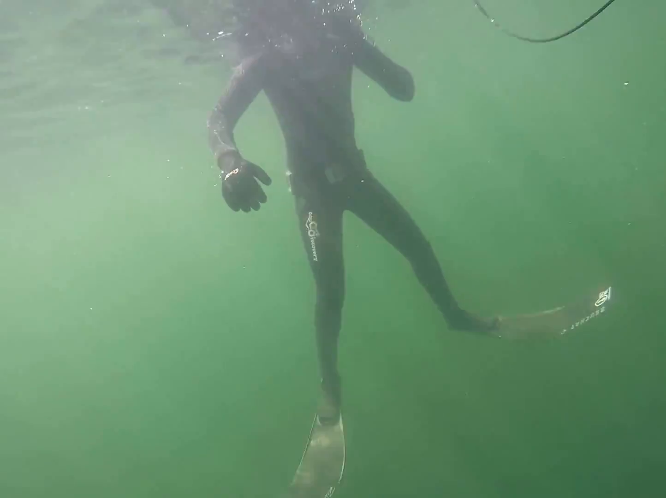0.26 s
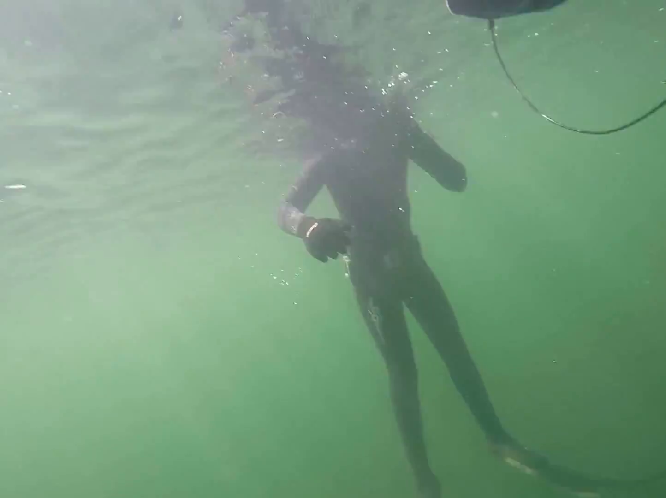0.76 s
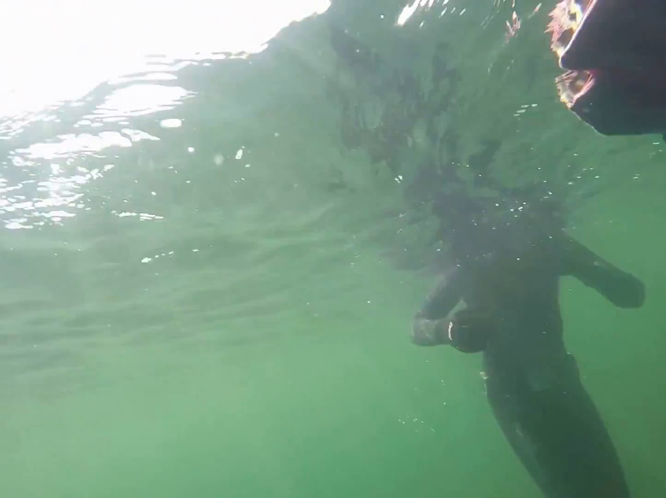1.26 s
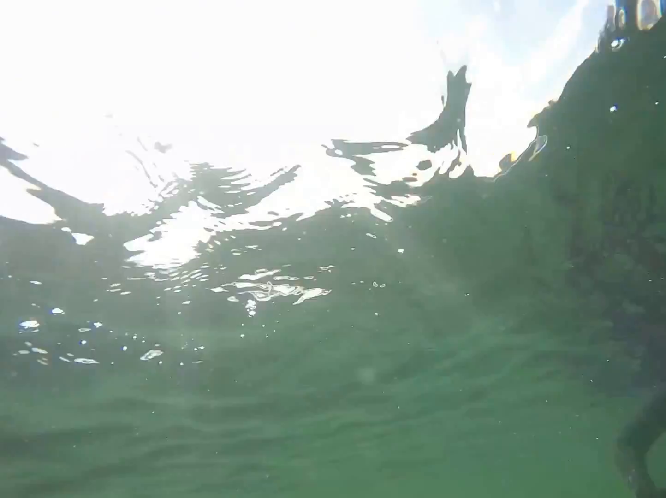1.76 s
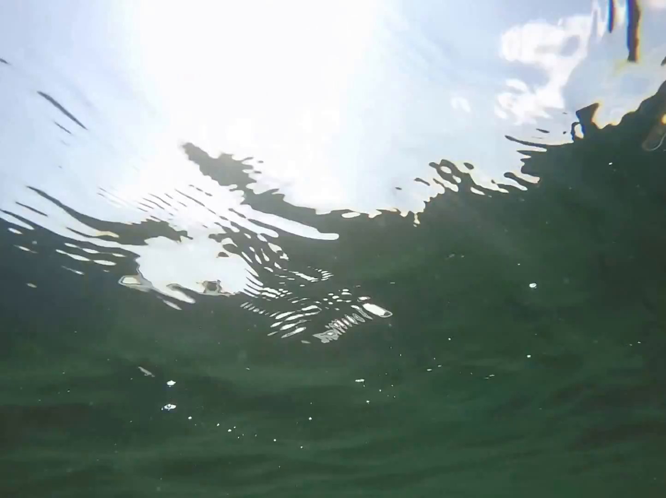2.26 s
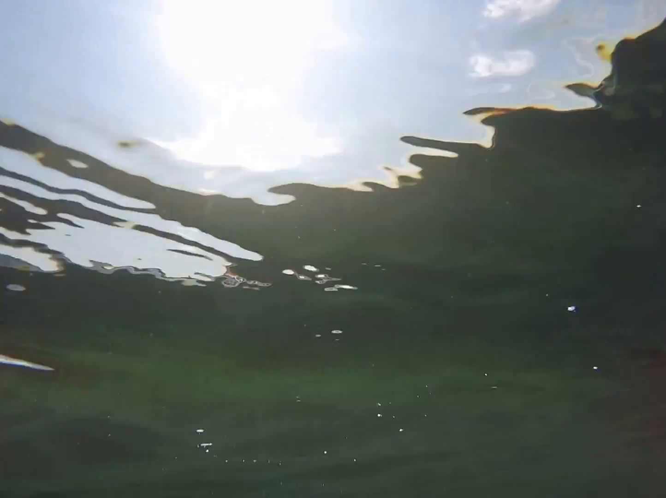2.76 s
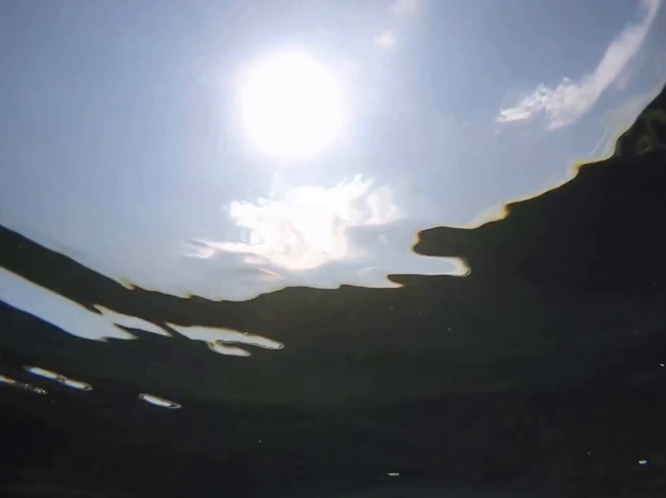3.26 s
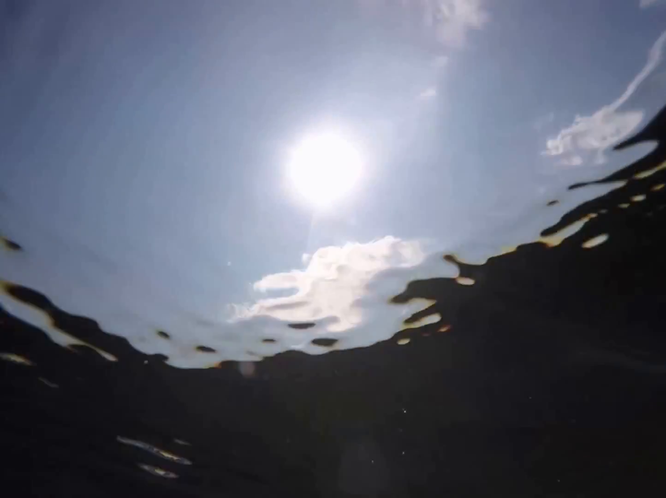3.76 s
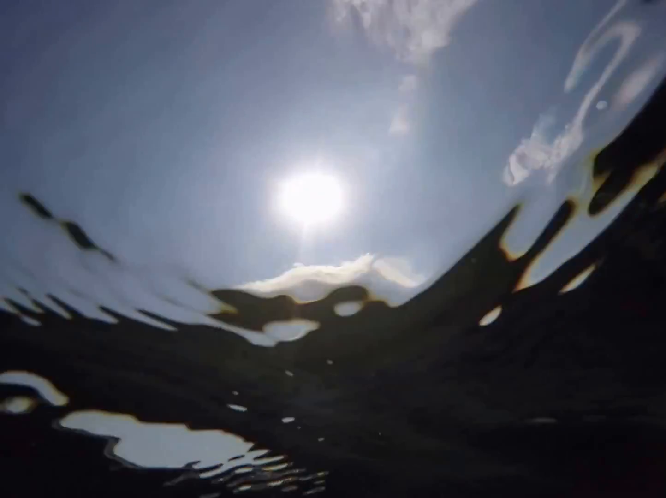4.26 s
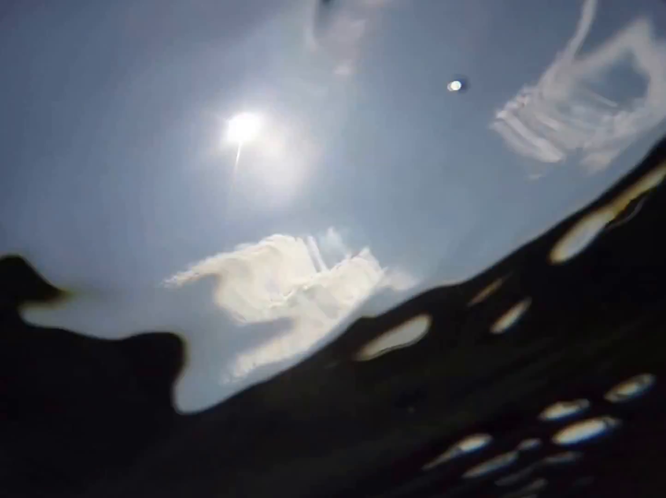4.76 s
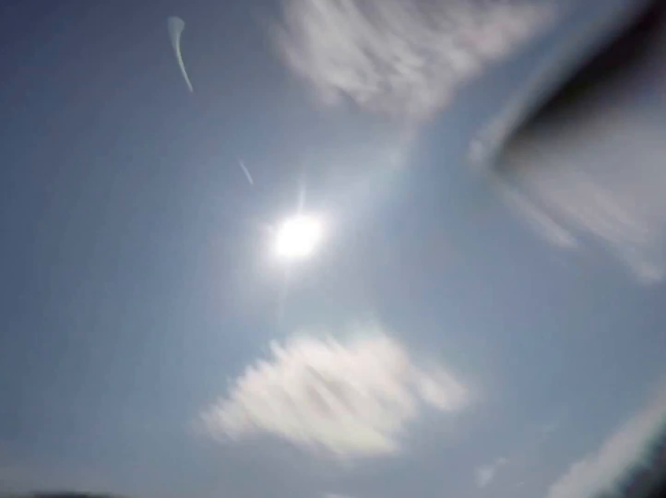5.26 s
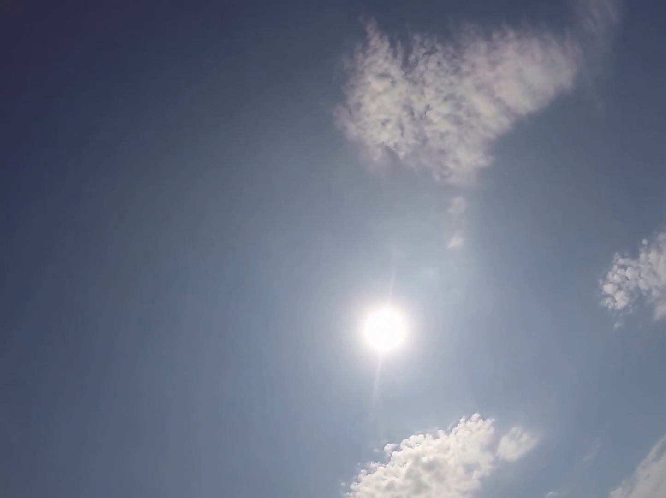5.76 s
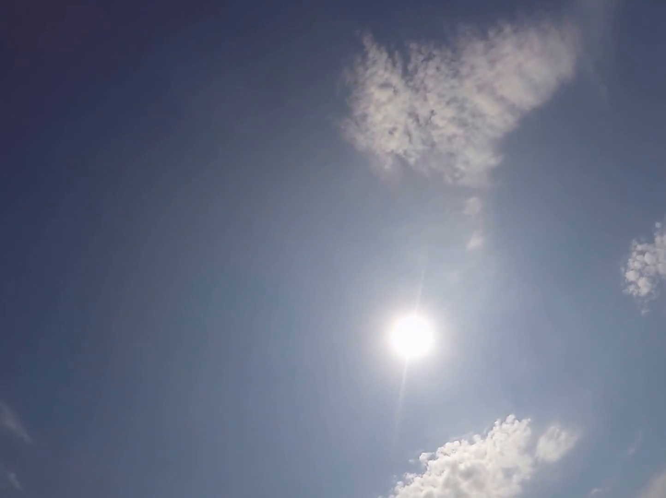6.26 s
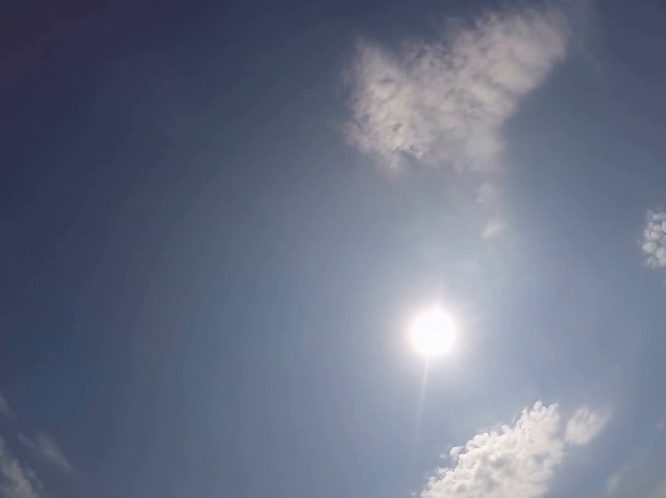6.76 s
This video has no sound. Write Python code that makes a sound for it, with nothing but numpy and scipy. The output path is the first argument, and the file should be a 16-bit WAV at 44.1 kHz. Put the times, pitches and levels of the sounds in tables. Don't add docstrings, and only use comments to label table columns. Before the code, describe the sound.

Inside a sealed camera housing held by a swimmer in a lake, everything is muffled and bass-heavy. Soft pulse thumps repeat twice a second over a lumpy rumble. A strong dull knock comes near one second, then rubs and shoves, a faint low air tone, and a burst of bubble pings. A bump marks surfacing, followed by short wet squeaky rubs and a faint trickle.

```python
import sys
import numpy as np
from scipy import signal
from scipy.fft import rfft, irfft, next_fast_len
from scipy.io import wavfile
from scipy.ndimage import uniform_filter1d, map_coordinates

SR = 44100
rng = np.random.default_rng(int(sys.argv[2]) if len(sys.argv) > 2 else 0)


def digitize_waveform(pressure):
    field = np.atleast_2d(pressure).T
    bounded = np.clip(field, -1, 1)
    quanta = np.round(bounded * 32767).astype(np.int16)
    wavfile.write(sys.argv[1], SR, quanta)


def makeup_ratio(level_db):
    decades = np.asarray(level_db, float) / 20
    return 10 ** decades


N = 308700
SURFACE_S = 5.3

# time in seconds, thump in dB, pitch in Hz, rebound in dB.
HEART_BEATS = [(.311, -20.5, 43.6, -27), (0.823, -13.5, 41.4, -26), (1.337, -13.5, 38, -24),
               (1.852, -17.5, 38, -24), (2.365, -18, 44.7, -35), (2.875, -20, 34.3, -29.5),
               (3.392, -21.5, 34.3, -27), (3.908, -22.5, 37.2, -25), (4.424, -22.5, 37.7, -26.5),
               (4.941, -23, 47.6, -28), (5.458, -20.5, 33, -31), (5.982, -21, 35, -31.5),
               (6.487, -29.5, 31.5, -27)]
# time in seconds, peak in dB, pitch in Hz, length in cycles.
HAND_SHOVES = [(0.883, -26, 34.4, 0.84), (.967, -24, 40.3, 0.45), (1.095, -27.5, 27.8, 3.3),
               (1.6108, -20, 42.8, 0.67), (1.663, -29, 23.5, 0.65), (2.12, -19, 33, 0.49),
               (3.495, -34.5, 21.75, 0.57), (6.538, -28.5, 25.5, 0.89), (1.803, -25, 43.7, 0.43),
               (1.906, -25.5, 44, 0.62), (1.968, -32, 41.6, 2.1), (2.033, -24.5, 33, 0.77),
               (2.321, -23.5, 37.3, 0.85), (2.504, -33, 38, 0.41), (2.965, -23, 53.6, 0.26),
               (4.689, -36, 36, 0.72), (5.338, -29, 80, 0.84), (5.3704, -26.5, 61.6, 1.83),
               (1.057, -25, 70.6, 0.76), (2.914, -28, 98, 0.47), (5.354, -25, 130, 0.25),
               (2.962, -30, 121, 0.39), (7.004, -36, 38, .5), (6.98, -43, 60, 0.34)]
# time in seconds, peak in dB, pitch in Hz, sharp edge in dB.
WALL_PUSHES = [(.0254, -51, 295, 1), (1.0426, -15.5, 270, -31), (2.651, -48, 400, -12),
               (2.837, -54, 292, 6.5), (2.979, -54.5, 345, 3), (3.45, -50.5, 358, -5),
               (3.633, -50, 150, -17), (5.237, -47, 352, -10), (5.342, -26, 190, -12),
               (5.35, -19.5, 272, -18), (5.389, -43, 296, -21), (6.309, -48, 242, -16),
               (5.3364, -29.5, 286, -20), (5.3328, -39, 250, -18)]
# time in seconds, peak in dB, pitch in Hz, sharp edge in dB.
WALL_PULLS = [(2.1612, -37.5, 279, -19), (2.244, -29, 345, -23), (2.333, -38, 129, -14),
              (2.733, -52, 258, -2), (2.914, -33.5, 203, -5), (2.957, -31.5, 218, -1.5),
              (3.763, -34.5, 210, -20.5), (5.403, -49, 320, -22)]
# time in seconds, peak in dB, pitch in Hz, length in cycles.
WALL_SWINGS = [
    (1.8931, -37.5, 310, 1.2),
    (2.928, -40.5, 360, 3),
    (5.3381, -31.5, 230, 0.92),
    (6.235, -40, 170, 0.37),
    (6.253, -40, 150, 0.42),
    (5.3608, -26.5, 345, 1.3),
]
# start in seconds, length in seconds, level in dB, brightness in dB, drumming in dB.
SKIN_RUBS = [(1.127, 0.11, -58.5, -6, -5), (1.298, 0.081, -68, -7, 4), (1.506, .055, -54, -7, 3.5),
             (1.595, .05, -61, -5, 9), (1.653, 0.067, -53, -6, 1), (1.807, 0.08, -68.5, -10, 7.5),
             (1.878, 0.086, -76.5, -12, 20.5), (1.967, 0.23, -65, -13, 12.5), (2.27, 0.22, -74, -8, 14),
             (2.493, .2, -81, -8, 12), (2.727, 0.37, -68.5, -9, -10), (3.832, 0.084, -77.5, -11, 12),
             (4.76, 0.22, -71.5, -11, 5.5), (5.02, 0.18, -82, -9, 9), (5.223, 0.05, -61, -5, 3),
             (5.43, 0.061, -67, -12, 2), (5.512, .085, -50.5, -7, -2), (5.612, 0.077, -51, -9, -2),
             (5.707, 0.098, -54, -2.5, 1.5), (5.92, 0.078, -61, -5.5, 5.5), (6.201, 0.061, -57, 2, 4.5),
             (6.382, 0.093, -73.5, -6, 8), (4.93, 0.18, -84.5, -11, 17.5)]
# time in seconds, pitch in Hz, level in dB.
AIR_SQUEEZE = [
    (2.469, 232, -53),
    (2.598, 238, -55.5),
    (2.689, 208.3, -53.5),
    (2.78, 201.4, -50),
    (2.86, 213.4, -49),
    (2.97, 212, -50),
    (3.07, 231, -63),
    (3.25, 212, -56.5),
    (3.52, 221.4, -62),
]
# time in seconds, peak in dB, pitch in Hz.
SINGLE_BUBBLES = [(.852, -47, 2450), (1.126, -49, 8140), (1.1853, -36, 7000), (1.31, -56, 8200),
                  (3.1598, -47.5, 1770), (3.16, -51, 5800), (3.169, -49.5, 2590), (3.1913, -48, 3910),
                  (3.2035, -54, 13600), (3.212, -38.5, 3280), (3.22, -54, 13200), (3.228, -53, 5500),
                  (3.236, -50, 8820), (3.2606, -53, 5800), (3.286, -50.5, 2700), (3.3, -52, 2800),
                  (3.312, -58, 3590), (3.3637, -48, 5370), (3.371, -57, 11800), (3.3816, -47.5, 5900),
                  (3.412, -42, 3395), (3.4975, -53, 5700), (3.62, -59, 3100), (6.448, -53, 2140),
                  (6.627, -54.5, 970), (6.665, -59, 2000), (6.756, -49, 1834)]
# time in seconds, peak in dB, pitch in Hz.
WALL_TICKS = [(.024, -49, 1230), (.0245, -48, 800), (3.195, -49, 9000), (3.348, -49, 1454),
              (3.3636, -49, 9500), (5.157, -56, 1890), (5.181, -49, 820), (5.1819, -51, 1750),
              (5.521, -47, 1010), (1.523, -45, 900), (5.799, -43, 4500), (6.201, -42, 4570),
              (6.341, -52, 1970), (6.391, -52, 2800), (6.427, -47, 1710), (6.555, -49, 2330),
              (6.569, -51.5, 865), (6.743, -48, 3500)]
# time in seconds, level in dB.
SWARM_LEVELS = [
    [(3.15, -80), (3.19, -71), (3.26, -64), (3.36, -64.5), (3.42, -83), (3.52, -83)],
    [(6.3, -81), (6.42, -67.5), (6.47, -62.5), (6.52, -66.5), (6.62, -64), (6.8, -67), (6.86, -58),
     (6.95, -58), (7, -57.5)],
]
# middle pitch in Hz, pitch spread, rate in bubbles per second, life in cycles.
SWARM_KINDS = [(3770, 0.361, 450, 33), (1897, .4, 5000, 26)]
# time in seconds, grip effort in dB, speed through the water in dB.
GRIP_AND_SPEED = [(0.0, -43, -53), (1.03, -36, -57), (1.58, -42, -68), (1.93, -36, -68.5),
                  (2.13, -35, -58.5), (2.4, -37.5, -65.5), (2.59, -45, -68), (2.81, -45.5, -67),
                  (3.12, -46.5, -73), (4.27, -46.5, -73.5), (4.58, -47, -59.5), (5.21, -48, -62),
                  (5.34, -48, -67.5), (5.65, -46.5, -66), (5.94, -45, -69.5), (6.24, -44.5, -79.5),
                  (6.61, -52, -74), (7.0, -43, -70.5)]
# frequency in Hz, density in dB per Hz.
RUMBLE_SPECTRUM = [(7.1, -28), (12, -2), (27, 7.5), (45, -9.5), (57, 1), (107, -22.5), (160, -38.5),
                   (210, -81), (350, -120)]
# frequency in Hz, density in dB per Hz.
FLOW_SPECTRUM = [(50, -38), (80, 4), (110, 0), (170, -5), (230, -8), (400, -47.5), (800, -75)]
# frequency in Hz, density in dB per Hz.
SWIRL_SPECTRUM = [(130, -33), (210, -1.5), (300, 2), (360, -4.5), (430, -13), (560, -20.5), (800, -25),
                  (1500, -52)]
# frequency in Hz, density in dB per Hz.
SHEEN_SPECTRUM = [(5000, -30), (7800, -6), (10500, -7), (13500, 2), (15300, 3)]
# frequency in Hz, density in dB per Hz.
HISS_SPECTRUM = [(180, -61), (300, -10.5), (326, -10.5), (509, -5.5), (663, -9.5), (720, -7.5),
                 (822, -10.5), (1280, -11), (1490, -12), (2990, -11.5), (15600, -24.5)]
# frequency in Hz, width in Hz, level in dB.
WALL_MODES = [(735, 286, 1.5), (1165, 300, -3), (1572, 190, -3.5)]
# frequency in Hz, width in Hz, level in dB.
LID_MODES = [(2800, 960, 15.5), (4760, 560, 16)]
# frequency in Hz, width in Hz, level in dB.
SHELL_MODES = [(345, 93, 0.5), (520, 320, -5)]


def heart():
    out = np.zeros(N)
    usual_db = np.mean(HEART_BEATS, axis=0)[1]
    loosen_db_per_s = 10.5
    for s, db, hz, rebound_db in HEART_BEATS:
        snap_db = -30.5 - loosen_db_per_s * max(s - SURFACE_S + 0.37, 0)
        second_db = -39.5 + 0.4 * (db - usual_db)
        add_push(out, s - 0.021, snap_db, hz=95, cycles=0.96)
        add_push(out, s - 0.0225, snap_db - 9, hz=193, cycles=0.43)
        add_push(out, s, db, hz, cycles=0.55)
        add_push(out, s + 0.0375, rebound_db, hz=33, cycles=0.51)
        add_push(out, s + 0.33, second_db, hz=38, cycles=0.72)
        add_push(out, s + 0.245, second_db - 9, hz=110, cycles=0.45)
    return out


def hand():
    shoves, pulls, pushes = np.zeros((3, N))
    for s, db, hz, cycles in HAND_SHOVES:
        add_push(shoves, s, db, hz, cycles)
    for s, db, hz, cycles in WALL_SWINGS:
        add_push(pulls, s, db, hz, cycles)
    for track, rows in ((pushes, WALL_PUSHES), (pulls, WALL_PULLS)):
        for s, db, hz, edge_db in rows:
            add_push(track, s, db + 2, hz, cycles=0.4)
            add_push(track, s - 0.0006, db + edge_db, 2.23 * hz, cycles=0.99)
    knocks = pulls - pushes
    shell_ring = filtered(knocks, resonant(SHELL_MODES))
    return shoves + knocks + makeup_ratio(-27) * shell_ring


def rubbing():
    grab_db_per_s, lift_db_per_s, arch_db = 692, 600, 8.5
    t = np.arange(N) / SR
    walls_level, lid_level, shell_level = np.zeros((3, N))
    for s, span, db, bright_db, drum_db in SKIN_RUBS:
        across = 2 * np.clip((t - s) / span, 0, 1) - 1
        level_db = db - arch_db * across ** 2 + gate(s, s + span, grab_db_per_s, lift_db_per_s)
        walls_level += makeup_ratio(level_db)
        lid_level += makeup_ratio(level_db + bright_db)
        shell_level += makeup_ratio(level_db + drum_db)
    grain = unit(makeup_ratio(2.1 * wobble(220)))
    in_air = np.arange(N) > SURFACE_S * SR
    air = makeup_ratio(-10) * lid_level * in_air * noise(shaped(SHEEN_SPECTRUM))
    walls = makeup_ratio(0.4) * walls_level * noise(resonant(WALL_MODES))
    lid = makeup_ratio(-4) * lid_level * noise(lambda hz: resonant(LID_MODES)(hz) / (1 + (hz / 5600) ** 6))
    drumming = makeup_ratio(-1) * noise(lambda hz: resonant(SHELL_MODES)(hz) ** 2)
    drag = makeup_ratio(-4.5) * noise(shaped(SWIRL_SPECTRUM))
    return grain * (walls + lid + shell_level * (drumming + drag) + air)


def squeeze():
    hz, db = uniform_filter1d(curves(AIR_SQUEEZE), size=SR // 25, axis=1)
    unsteady_hz = hz * (1 + 0.0065 * wobble(34.7))
    phase = 2 * np.pi * np.cumsum(unsteady_hz) / SR
    leak_db = gate(AIR_SQUEEZE[0][0], AIR_SQUEEZE[-1][0], rise_db_per_s=380, fall_db_per_s=260)
    level = makeup_ratio(db + leak_db + 1.1 * wobble(25.36))
    return np.sqrt(2) * level * (np.sin(phase) + makeup_ratio(-23.5) * np.sin(2 * phase))


def bubbles():
    out = np.zeros(N)
    for rows, cycles in ((SINGLE_BUBBLES, 63), (WALL_TICKS, 19)):
        s, db, hz = np.transpose(rows)
        out += ringing(s, db, hz, cycles / hz)
    for rows, (middle_hz, spread, rate, cycles) in zip(SWARM_LEVELS, SWARM_KINDS):
        start, span = rows[0][0], rows[-1][0] - rows[0][0]
        when, pitch, size, life = rng.random((4500, 4))[:int(rate * span)].T
        hz = np.clip(middle_hz * (pitch / (1 - pitch)) ** (spread / 2), 600, 14000)
        db = -2.5 * np.log(size + 0.03) + 2.2 * np.log2(hz / middle_hz)
        t60_s = cycles * (0.25 + 2.5 * life ** 2) / hz
        swarm = ringing(start + span * when, db, hz, t60_s)
        level = makeup_ratio(curves(rows, outside=-120)[0])
        out += level * unit(swarm) * np.sqrt(span * SR / N)
    return out


def water():
    grip_db, speed_db = curves(GRIP_AND_SPEED)
    flow_db = -54.5 + 0.28 * (grip_db - grip_db.mean()) + 0.74 * (speed_db - speed_db.mean())
    rumble = unit(makeup_ratio(3 * wobble(12)) * noise(shaped(RUMBLE_SPECTRUM)))
    gust_db = 1.3 * wobble(30) + 0.6 * wobble(7)
    flow = unit(makeup_ratio(gust_db) * noise(shaped(FLOW_SPECTRUM)))
    swirl = unit(makeup_ratio(gust_db + 2.1 * wobble(60)) * noise(shaped(SWIRL_SPECTRUM)))
    return makeup_ratio(grip_db + 3) * rumble + makeup_ratio(flow_db) * flow + makeup_ratio(speed_db + 0.5) * swirl


def add_push(track, s, db, hz, cycles):
    first, last = max(round((s - 0.1) * SR), 0), round((s + 0.1) * SR)
    turns = (np.arange(N)[first:last] / SR - s) * hz
    push = np.cos(2 * np.pi * turns) * np.exp(-(turns / cycles) ** 2)
    track[first:][:len(turns)] -= makeup_ratio(db) * push


def ringing(s, db, hz, t60_s):
    t = np.arange(int(min(t60_s.max(), 0.04) * SR)) / SR
    life = t / t60_s[:, None]
    decay = makeup_ratio(db[:, None] - 60 * life)
    onset = 1 - np.exp(-t / 0.000037)
    waves = decay * np.sin(2 * np.pi * hz[:, None] * t * (1 + 0.0092 * life)) * onset
    spots = np.round(s * SR).astype(int)[:, None] + np.arange(len(t))
    return np.bincount(spots.ravel(), waves.ravel(), N + SR)[:N]


def unit(x):
    return x / np.sqrt(np.mean(x ** 2) + 1e-20)


def curves(rows, outside=None):
    s, *cols = np.transpose(rows)
    return [np.interp(np.arange(N) / SR, s, c, outside, outside) for c in cols]


def wobble(rate_hz):
    knots = rng.standard_normal(int(N * rate_hz / SR) + 4)
    return map_coordinates(knots, [np.arange(N) * rate_hz / SR])


def gate(start_s, end_s, rise_db_per_s, fall_db_per_s):
    t = np.arange(N) / SR
    return -rise_db_per_s * np.maximum(start_s - t, 0) - fall_db_per_s * np.maximum(t - end_s, 0)


def filtered(x, response):
    m = next_fast_len(N + 8192)
    return irfft(rfft(x, m) * response(np.fft.rfftfreq(m, 1 / SR)), m)[:N]


def noise(response):
    return unit(filtered(rng.standard_normal(N), response))


def shaped(points):
    f, db = np.transpose(points)
    return lambda hz: makeup_ratio(np.interp(np.log(hz + 1), np.log(f + 1), db))


def resonant(modes):
    def response(f):
        total = 0
        for k, (hz, width_hz, db) in enumerate(modes):
            damping = 1j * f * width_hz
            total = total + (-1) ** k * makeup_ratio(db) * damping / (hz * hz - f * f + damping)
        return total
    return response


def scene():
    return (heart() + hand() + rubbing() + squeeze() + bubbles() + water())[None]


def band_limit(x):
    return signal.sosfilt(signal.butter(12, 15740, fs=SR, output="sos"), x)


def record(dry):
    top_hz, holes_above_hz = 15150, 12800
    x = dry + makeup_ratio(-66) * noise(shaped(HISS_SPECTRUM))
    hz, _, z = signal.stft(x, SR, nperseg=512)
    load_db = 10 * np.log10((abs(z) ** 2).sum(1) + 1e-12)
    edge_hz = top_hz + 130 * map_coordinates(rng.standard_normal(200), [np.linspace(0, 90, z.shape[2])])
    luck = uniform_filter1d(rng.standard_normal(z.shape[1:]), size=7, axis=0)
    luck = unit(uniform_filter1d(luck, size=3, axis=1))
    needed_luck = np.maximum(1.9 - 0.13 * (load_db + 44), 0.5)
    holes = (hz[:, None] > holes_above_hz) & (luck > needed_luck)
    z = z * (hz[:, None] < edge_hz) * np.where(holes, makeup_ratio(-20), 1)
    x = signal.istft(z, SR, nperseg=512)[1][:, :N]
    return band_limit(x)


dry = scene()
out = record(dry)
digitize_waveform(out)
```